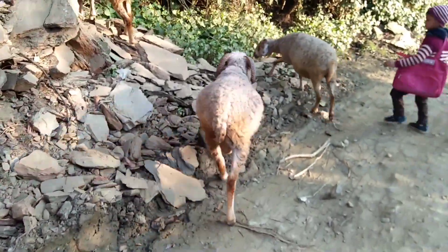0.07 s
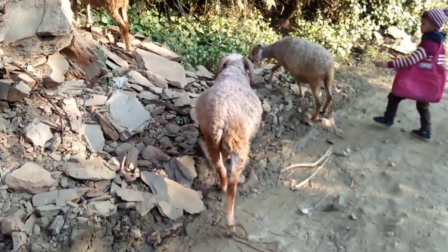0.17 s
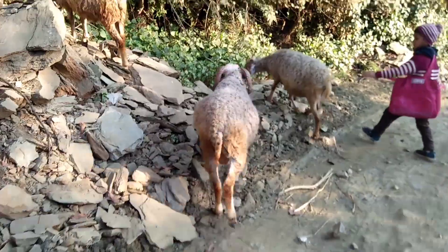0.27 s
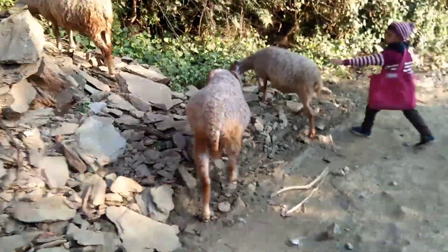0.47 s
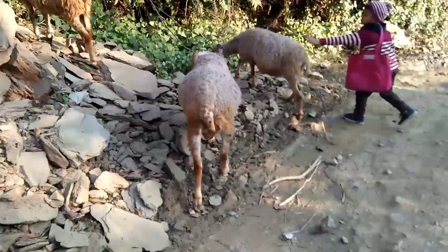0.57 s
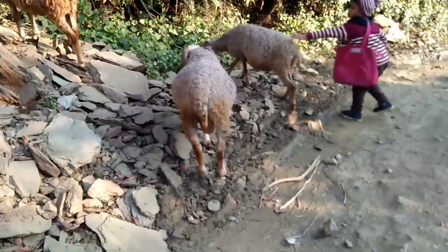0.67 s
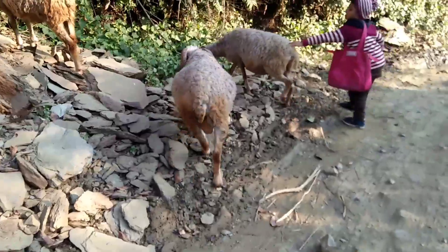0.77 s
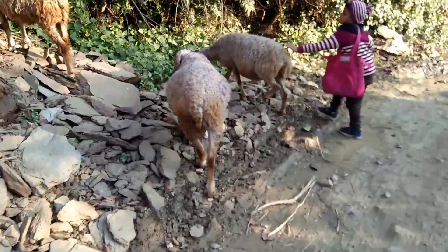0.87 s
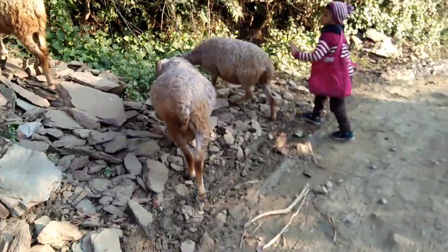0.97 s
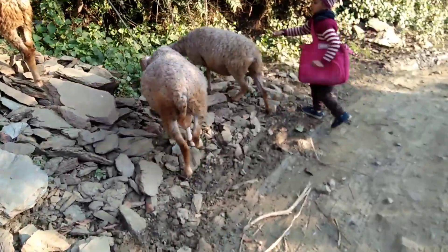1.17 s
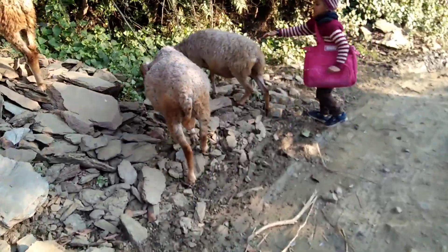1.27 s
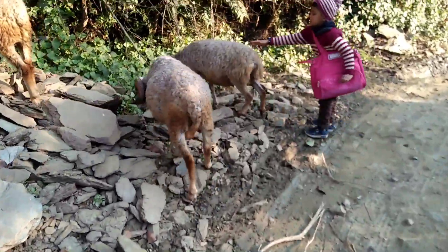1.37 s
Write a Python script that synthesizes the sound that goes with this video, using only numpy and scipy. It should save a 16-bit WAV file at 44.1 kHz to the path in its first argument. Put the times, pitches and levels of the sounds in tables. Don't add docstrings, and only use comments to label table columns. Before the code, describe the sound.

A small metal bell on a sheep's collar rings close by, softly then with two stronger strikes, its clear note shimmering and dying away; hooves knock stones and leaves rustle faintly on an open hillside path.

```python
import sys
import numpy as np
from scipy import signal
from scipy.io import wavfile

SR = 44100
rng = np.random.default_rng(int(sys.argv[2]) if len(sys.argv) > 2 else 0)


def wrap_up_sound(samples):
    columns = np.atleast_2d(samples).T
    tamed = np.clip(columns, -1, 1)
    steps = np.round(tamed * 32767).astype(np.int16)
    wavfile.write(sys.argv[1], SR, steps)


def linear_from_db(decibels):
    return 10 ** (np.asarray(decibels, float) / 20)


N = 61739
T = np.arange(N) / SR


def rms_one(x):
    return x / np.sqrt(np.mean(x ** 2) + 1e-20)


def filtered(noise, edges_hz, kind="band"):
    return signal.sosfilt(signal.butter(2, edges_hz, kind, fs=SR, output="sos"), noise)


def drift(rate):
    r = np.exp(-80 * np.pi * rate / SR)
    white = rng.standard_normal(N // 40 + 2002)
    slow = signal.lfilter([1], [1, -2 * r, r * r], white)[2000:]
    return np.interp(np.arange(N) / 40, np.arange(len(slow)), rms_one(slow))


def rise(age, attack):
    return np.sin(np.pi / 2 * np.clip(age / attack, 0, 1)) ** 2


def shaped(white, spectrum, patchy_db):
    hz, level_db = np.transpose(spectrum)
    edges = hz[0] * 2 ** np.arange(0, np.log2(hz[-1] / hz[0]) + .5, .5)
    out = 0
    for k, (low, high) in enumerate(zip(edges, edges[1:])):
        band = filtered(white[k % 2], [low, min(high, .45 * SR)])
        db = np.interp(np.log(low * high) / 2, np.log(hz), level_db)
        out = out + band * linear_from_db(db + patchy_db * drift(14))
    return rms_one(out)


def stirring():
    # (middle t/s, length/s, swell level/dB)
    stir_table = [(0.013, 0.083, 13), (0.136, 0.072, 11.5), (0.245, 0.076, 10.5), (0.291, 0.049, 16),
                  (0.367, 0.12, 8), (0.434, 0.079, 10.5), (0.66, 0.019, 3.5), (0.837, 0.072, 5),
                  (0.939, 0.088, 9), (1.012, 0.067, 9), (1.078, 0.062, 5.5), (1.161, 0.047, 10),
                  (1.219, 0.021, 4.5), (1.263, 0.072, 3.5), (1.39, .04, -2)]
    swells = [db * rise(length * 0.89 - np.abs(T - s), length * 0.59) for s, length, db in stir_table]
    return np.max(swells, axis=0)


def valley(stir):
    # (f/Hz, level per Hz/dB)
    hum_colour = [(25, -13.5), (100, -11), (210, -14.5), (380, -23.5), (480, -7.5), (900, 0), (2400, -16.5),
                  (4500, -46)]
    # (t/s, level/dB)
    hum_swell = [(0, -3.5), (.3, -2.5), (.5, 2.5), (1.1, -0.6), (1.4, -3)]
    level_db = -68 + np.interp(T, *np.transpose(hum_swell))
    level_db = level_db + 0.045 * (stir - stir.mean())
    return linear_from_db(level_db) * shaped(rng.standard_normal((2, N)), hum_colour, patchy_db=2.0)


def drone():
    centre_hz, width_hz = 302, 44
    comes_s, early_share = .3, .3
    hum = rms_one(filtered(rng.standard_normal(N), [centre_hz - width_hz / 2, centre_hz + width_hz / 2]))
    return linear_from_db(-81) * (early_share + (1 - early_share) * rise(T - comes_s, .06)) * hum


def leaves(stir):
    # (f/Hz, level per Hz/dB)
    rustle_colour = [(1060, -35.5), (1800, -7), (2370, -2.5), (3080, -15.5), (4420, -18.5), (7120, -13.5),
                     (13600, -13), (14800, -12.5)]
    grains_per_s, grain_db, grain_spread_db = 4200, -8.5, -2
    happens = rng.random((2, N)) < grains_per_s / SR
    size = linear_from_db(grain_spread_db * rng.exponential(1, (2, N)))
    grains = rms_one(happens * size * rng.choice([-1, 1], (2, N)))
    rustle = rng.standard_normal((2, N)) + linear_from_db(grain_db) * grains
    return linear_from_db(stir - 82.5) * shaped(rustle, rustle_colour, patchy_db=.8)


def gravel():
    middle_s, length_s = 0.48, 0.35
    hiss = rms_one(filtered(rng.standard_normal(N), (1400, 2900)))
    swell = rise(length_s - np.abs(T - middle_s), length_s)
    return linear_from_db(-73 + 2.0 * drift(13)) * swell * hiss


def snaps():
    # (t/s, peak level/dB, low edge f/Hz, fade length/s)
    snap_table = [
        (.155, -63, 1900, 0.0028),
        (0.17, -76, 2500, .0015),
        (1.1835, -51, 1200, 0.0018),
        (1, -91.5, 6100, 0.0021),
        (1.393, -58, 13600, 0.007),
        (0.2, -74, 2800, 0.0035),
    ]
    out, white = np.zeros(N), rng.standard_normal(N)
    for s, db, hz, length in snap_table:
        crack = rms_one(filtered(white, hz, "high"))
        out += (T > s) * linear_from_db(db - 2) * np.exp(-np.maximum(T - s, 0) / length) * crack
    return out


def stones():
    # (t/s, peak level/dB, f/Hz, time to fall 60 dB/s)
    knock_table = [(0.0806, -57.5, 2480, 0.041), (.094, -65, 2464, 0.09), (.1151, -65, 2395, .083),
                   (.337, -56, 1400, 0.056), (.351, -68, 295, .17), (.4055, -47.5, 2290, .03),
                   (0.406, -57.5, 1850, 0.017), (.406, -59.5, 2950, .018), (.4115, -52.5, 2320, 0.036),
                   (.431, -69.5, 4600, .015), (.436, -69.5, 3800, .02), (.47, -75, 4400, .015),
                   (0.471, -65, 150, 0.093), (.473, -52, 2750, 0.015), (.4755, -44, 2070, 0.019),
                   (0.477, -62, 65, 0.17), (0.5005, -61.5, 340, .04), (0.504, -48, 300, 0.065),
                   (0.514, -67, 55, .15), (.5135, -47.5, 658, 0.05), (.5155, -40, 1847, 0.022),
                   (0.5148, -41.5, 2357, 0.016), (.516, -45.5, 1480, .012), (.517, -70.5, 4650, .012),
                   (.5205, -62.5, 3150, .01), (.5195, -44.5, 2670, 0.018), (0.5216, -70, 1790, .02),
                   (0.58, -71.5, 300, 0.069), (.598, -60, 301, 0.065), (.652, -77.5, 6300, 0.042),
                   (.797, -57.5, 840, .09), (.799, -68, 133, 0.082), (.869, -68.5, 154, 0.14),
                   (1.021, -72, 620, 0.073), (1.03, -52.5, 140, .055), (1.033, -53.5, 285, .035),
                   (1.046, -60, 875, 0.12), (1.082, -73, 4080, 0.052), (1.208, -61, 67, 0.1),
                   (1.22, -56.5, 792, 0.075), (.005, -76.5, 6170, 0.24), (.64, -61.5, 514, 0.053),
                   (0.671, -67, 463, 0.087), (1.232, -67, 439, 0.16), (1.274, -67.5, 426, 0.17),
                   (1.328, -72, 440, .1), (1.365, -69, 436, .1)]
    stem_crack = (1.1438, -60, 11200, .012)
    grit_share, grit_width = .25, 1.2
    out, grit = np.zeros(N), rng.standard_normal(N)
    for s, db, hz, t60 in [*knock_table, stem_crack]:
        age = np.maximum(T - s, 0)
        puff = rms_one(filtered(grit, [hz / grit_width, hz * grit_width]))
        tone = np.sin(2 * np.pi * hz * age)
        out += rise(age, 2 / hz) * linear_from_db(db - 60 * age / t60) * (tone + grit_share * puff)
    return out


def flat_stone():
    age = np.maximum(T - .992, 0)
    hz, glide_hz_per_s = 850, 1300
    drop_hz, drop_s = 150, .004
    turns = (hz + glide_hz_per_s * age / 2) * age - drop_hz * drop_s * np.exp(-age / drop_s)
    fade = np.exp(-.5 * (age / .02) ** 2)
    return rise(age, .02) * linear_from_db(-42.5) * fade * np.sin(2 * np.pi * turns)


def hum_pair(age, peak, hold, high_db, low_db):
    high_hz, low_hz = 1156.3, 1082.0
    sag_hz, recover_s = 3.3, .09
    sag = sag_hz * np.cumsum(1 - rise(age - hold, recover_s)) / SR
    high = linear_from_db(high_db) * np.sin(2 * np.pi * (high_hz * (T - peak) - sag))
    low = linear_from_db(low_db) * np.sin(2 * np.pi * (low_hz * (T - peak) - sag))
    return np.sqrt(2) * (high + low)


def second_pair(age, lobes):
    when, *lobe_db = np.transpose(lobes)
    out = np.zeros(N)
    for hz, db in zip((2999, 3159), lobe_db):
        phase = 2 * np.pi * hz * age + .28 * drift(31)
        out += np.sqrt(2) * linear_from_db(np.interp(T, when, db)) * np.sin(phase)
    return out


def upper_tones(s, age, side, upper_db, wool):
    tone_hz = [5596, 5721, 7583, 7851, 8232, 8845, 10183, 10353, 11400, 12793, 13677]
    # (near-side level/dB, far-side level/dB, time to fall 60 dB/s, flutter f/Hz, first swell t/s)
    tone_table = [(-82.5, -69, 1.2, 13.5, .037), (-77, -88, 1.7, 1.8, 0.032), (-92, -73.5, .41, 5.1, .025),
                  (-73.5, -77.5, .27, 7.7, .025), (-68, -79, 0.43, 29, 0.0092),
                  (-81, -81, .085, 5.8, 0.033), (-71, -58, 0.15, 7.2, 0.03), (-62, -78.5, .085, 4.2, 0.027),
                  (-77, -80, 0.34, 6.8, 0.025), (-68.5, -64, 0.098, 4.5, .03), (-65.5, -86, 0.13, 13, .03)]
    muffle_s, muffle_keep = .44, .3
    brush_s, brush_db, brush_above_hz = .933, -12, 7000
    brush_keep = 0.12
    ragged = .16
    jolt = drift(20)
    muffle = 1 - (1 - muffle_keep) * rise(T - muffle_s, .015) * (s < muffle_s)
    out = np.zeros(N)
    for hz, (near_db, far_db, t60, flutter_hz, swell) in zip(tone_hz, tone_table):
        steady = 1.7 if hz == tone_hz[0] else 1.25
        turn = steady + np.cos(2 * np.pi * flutter_hz * (age - swell))
        die = linear_from_db(-60 * age / t60)
        if s > .5:
            if hz > brush_above_hz:
                change = linear_from_db(brush_db - 60 * np.abs(T - brush_s) / t60)
            else:
                change = (brush_keep - 1) * die
            die = die + rise(T - brush_s, .004) * change
        level = linear_from_db(upper_db + near_db + side * (far_db - near_db))
        tone = np.sin(2 * np.pi * hz * age + ragged * hz / 1000 * jolt)
        out += level * wool * muffle * die * turn * tone
    return out


def bell():
    # (t/s, attack/s, side struck 0-1, upper tones level/dB)
    strike_table = [
        (-0.02, 0.0045, 0.6, -27),
        (0.1973, 0.0081, 0.77, -16.5),
        (0.3355, 0.0041, 0.04, 0),
        (0.795, 0.0086, 0.78, -0.5),
    ]
    beat_peaks = [.0982, .2759, .502, 1.0252]
    sag_holds = [.05, .05, .03, .15]
    # (t/s, upper hum level/dB, lower hum level/dB)
    facing_tables = [
        [(0.01, -53, -58), (0.044, -44, -52.5), (0.126, -58, -48.5), (0.185, -57, -54.5)],
        [(0.215, -41.5, -55), (0.259, -44, -56), (0.317, -48, -53.5), (0.322, -51.5, -54.5)],
        [(0.352, -31.5, -43.5), (0.428, -38, -46), (0.508, -38, -44.5), (0.604, -43, -53),
         (0.776, -62.5, -62.5), (0.785, -60, -72.5)],
        [(0.815, -30.5, -48), (.87, -34.5, -55.5), (0.897, -37, -53), (.94, -37.5, -48), (1.041, -38.5, -47),
         (1.121, -45.5, -51.5), (1.173, -56, -59), (1.259, -72, -82), (1.39, -84, -105)],
    ]
    # (t/s, lower tone level/dB, upper tone level/dB)
    lobe_tables = [
        [(.01, -89, -84), (.046, -72, -90), (.09, -103, -93), (.14, -99, -85), (.185, -91, -102.5)],
        [(.21, -76.5, -89), (.25, -88, -94), (.275, -75, -84), (.322, -90.5, -86)],
        [(.348, -72, -58), (.36, -73, -53), (.378, -75, -68), (.4, -66.5, -62), (.44, -87, -59),
         (.465, -70.5, -66), (.505, -80, -62), (.55, -80.5, -76), (.585, -79.5, -67), (.615, -89.5, -88)],
    ]
    last_lobes = [(.806, -61, -76), (.83, -59.5, -77), (.841, -72, -75), (.852, -58.5, -74),
                  (.875, -55.5, -73), (.902, -60, -72), (.915, -80, -73), (.928, -66, -78),
                  (.945, -64.5, -94), (1.0, -64, -67), (1.03, -65, -79), (1.06, -58, -71),
                  (1.085, -61, -74), (1.11, -77, -85), (1.165, -64, -90), (1.22, -77, -98),
                  (1.25, -92, -103), (1.29, -83, -103), (1.36, -92, -103)]
    out = np.zeros(N)
    rings = zip(strike_table, beat_peaks, sag_holds, facing_tables, [*lobe_tables, last_lobes])
    for (s, attack, side, upper_db), peak, hold, facing, lobes in rings:
        age = np.maximum(T - s, 0)
        when, high_rows, low_rows = np.transpose(facing)
        high_db = np.interp(T, when, high_rows)
        low_db = np.interp(T, when, low_rows)
        wool = linear_from_db(.2 * (high_db - high_rows.max()))
        ring = hum_pair(age, peak, hold, high_db, low_db)
        ring = ring + second_pair(age, lobes)
        ring = ring + upper_tones(s, age, side, upper_db, wool)
        out += rise(T - s, attack) * (ring - out)
    return out


def scene():
    stir = stirring()
    background = valley(stir) + drone() + leaves(stir)
    path = gravel() + snaps() + stones() + flat_stone()
    return (background + path + bell())[None]


def roll_off(x):
    return signal.sosfilt(signal.butter(12, 15330, fs=SR, output="sos"), x)


def record(dry):
    mix = signal.sosfilt(signal.cheby2(12, 60, 15150, fs=SR, output="sos"), dry)
    return roll_off(mix)


dry = scene()
out = record(dry)
wrap_up_sound(out)
```